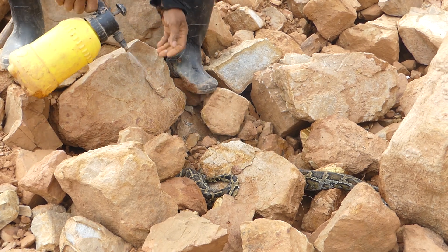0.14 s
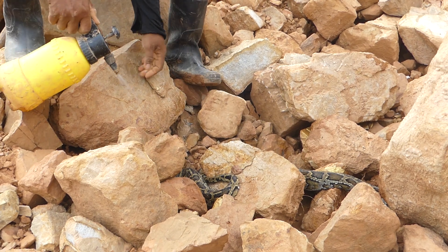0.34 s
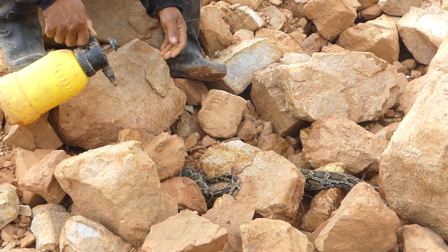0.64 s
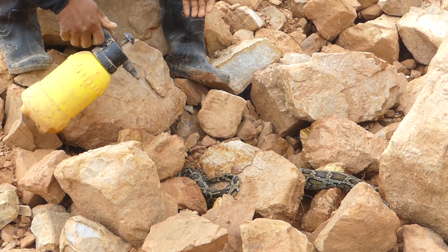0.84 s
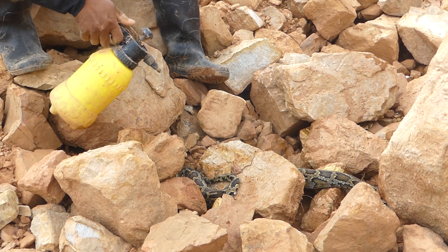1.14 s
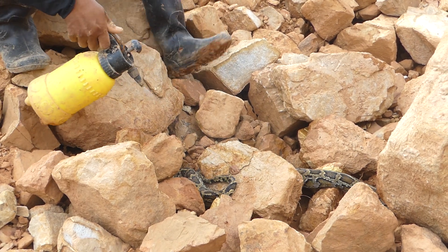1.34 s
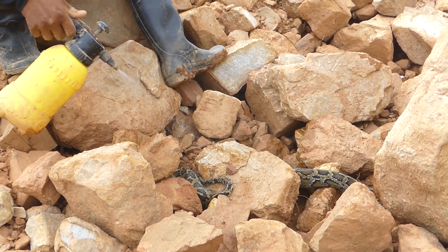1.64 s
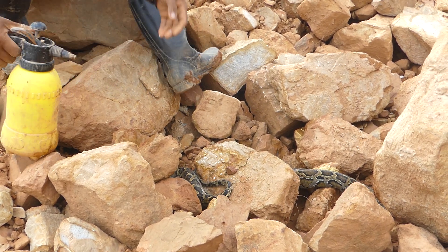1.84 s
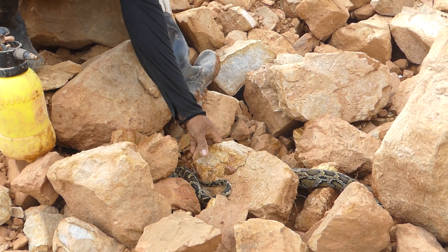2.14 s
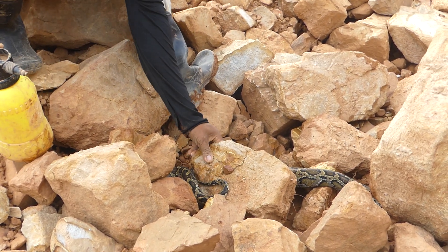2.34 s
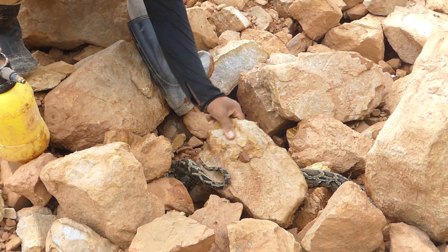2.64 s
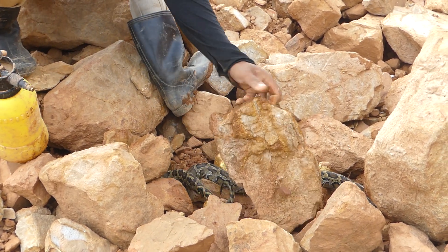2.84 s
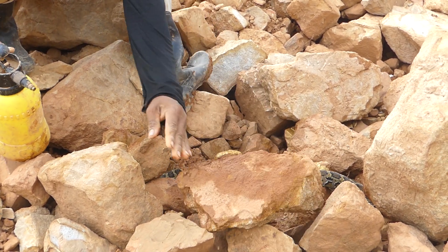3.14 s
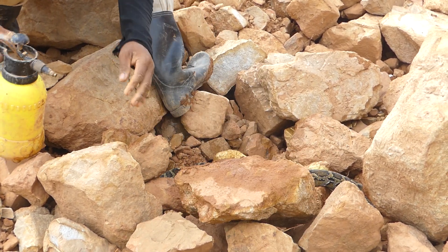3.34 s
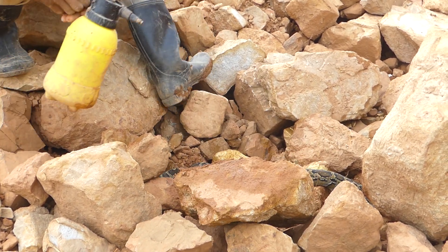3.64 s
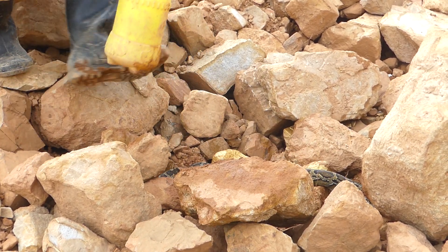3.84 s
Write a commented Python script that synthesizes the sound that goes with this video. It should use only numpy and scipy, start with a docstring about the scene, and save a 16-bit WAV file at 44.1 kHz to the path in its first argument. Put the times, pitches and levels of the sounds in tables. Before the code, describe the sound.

Boots shuffle over loose rocks and a stone tips over, with wind thumping the microphone.

```python
"""On a dry slope, rubber boots shuffle over loose rocks; a large stone is gripped, tips, slides and lands.
Impacts excite the damped modes of stones as dull knocks, and small chips tick. Stick-slip friction
makes grit scrape, stone grind and soles squeak. Nearby rocks scatter a short tail over a faint rustle.
Close by, wind and handling buffet the two microphone ports in short low thumps."""
import sys
import numpy as np
from scipy import signal
from scipy.fft import rfft, irfft
from scipy.io import wavfile

SR = 44100
rng = np.random.default_rng(int(sys.argv[2]) if len(sys.argv) > 2 else 0)


def digitize_waveform(pressure):
    """Quantize a signal to 16-bit integers and store it at the path in sys.argv[1].

    Rows of a 2-D input are taken as channels; values are limited to [-1, 1].
    """
    field = np.atleast_2d(pressure).T
    bounded = np.clip(field, -1, 1)
    quanta = np.round(bounded * 32767).astype(np.int16)
    wavfile.write(sys.argv[1], SR, quanta)


N = 176400
TIME = np.arange(N) / SR
SIDE = np.array([[1], [-1]])  # opposite polarity in left and right

# Likeness of the two channels in diffuse sound: frequency_hz, correlation
COHERENCE = [(100, 0.87), (400, 0.14), (900, 0.44), (2000, 0.55), (5000, 0.84), (11000, 0.68)]
# Rustle of clothes and dust: time_s, level_db
RUSTLE_LEVELS = [(0, -48.5), (1.48, -43.5), (1.51, -56), (1.57, -47), (1.65, -44), (2.2, -51.5), (2.7, -49),
                 (2.93, -49), (3.2, -42.5), (3.44, -49), (4, -49)]
# Colour of the rustle: frequency_hz, gain_db
RUSTLE_COLOUR = [(40, -6), (150, -7), (400, 3), (1300, -7.5), (2000, -9), (3000, -11.5), (5000, -13),
                 (7500, -17.5)]
# Wind between the buffets: time_s, level_db
WIND_LEVELS = [(.14, -28), (.17, -34.5), (.42, -29), (.72, -32.5), (.88, -38.5), (1.0, -57), (1.53, -48.5),
               (1.62, -42.5), (1.76, -36), (2.0, -44.5), (2.1, -63), (2.26, -49), (2.38, -38.5),
               (2.86, -34.5), (2.92, -56), (3.55, -45), (3.72, -35.5), (4, -39)]
# Colour of the wind: frequency_hz, gain_db
WIND_COLOUR = [(25, -27), (50, -25.5), (85, -1.5), (170, -2), (300, -11.5), (500, -34.5), (2000, -51)]
# Eddies and bumps at the ports: centre_s, half_length_s, level_db, pitch_hz, left_over_right_db
PORT_BUFFETS = [(0.0178, 0.00086, -6.5, 356, 12.5), (0.017, 0.0053, -15.5, 194, -1),
                (0.068, 0.0064, -13, 225, 0), (0.099, 0.01, -15, 224, 3.5), (0.136, 0.011, -16, 281, 0.5),
                (0.259, 0.0071, -23, 240, 2.5), (0.289, 0.015, -24.5, 217, 5), (0.385, 0.0067, -12, 278, 4),
                (.404, 0.024, -21.5, 201, -4), (0.427, 0.0046, -16.5, 239, 6),
                (0.489, 0.0067, -26.5, 235, 6.5), (0.678, 0.0055, -21, 182, 0),
                (0.706, 0.0096, -26, 252, 5), (1.568, 0.01, -28.5, 109, -1),
                (1.731, 0.012, -29.5, 151, 0.5), (2.398, 0.0054, -17.5, 139, 4.5),
                (2.411, 0.0026, -13.5, 150, 2), (2.511, 0.008, -28.5, 227, -2),
                (2.585, 0.0045, -23, 203, 4), (2.759, 0.0056, -26, 158, 6), (2.835, 0.0046, -20, 160, 6),
                (2.879, 0.0063, -26.5, 203, 0), (3.615, 0.0085, -29, 212, -0.5),
                (3.765, 0.0087, -24.5, 182, -1), (3.78, 0.0042, -16, 150, -1.5),
                (3.801, 0.0052, -17, 167, -0.5), (3.847, 0.0047, -29, 158, 0), (3.933, 0.0026, -27, 227, 0),
                (3.960, 0.0043, -28, 175, 4.5)]
# Rubber slipping on stone: centre_s, half_length_s, level_db, pitch_hz
SOLE_SQUEAKS = [(1.483, 0.0031, -37.5, 1750), (1.599, 0.0057, -34.5, 1786)]
# Chips that snap or tick: start_s, level_db, pitch_hz, width_octaves, decay_s
CHIP_TICKS = [(0.64, -40.5, 2500, 2.7, .005), (0.922, -37, 2400, 5.7, 0.0016),
              (1.035, -36, 4400, 2.3, 0.002), (1.305, -31, 2160, 2.6, 0.005),
              (1.321, -27, 2740, 1.5, 0.016), (1.931, -28, 2740, 0.077, 0.0025),
              (2.018, -36.5, 2000, 2.7, 0.0075), (2.35, -45, 6400, 0.88, 0.0052),
              (2.436, -43.5, 3280, 1, 0.0096), (2.768, -30.5, 10800, 1.6, 0.0048),
              (2.791, -32, 1580, 1.2, 0.0053), (2.862, -33, 2020, 0.3, 0.0041),
              (3.004, -25, 3700, 1.2, 0.0019), (3.083, -34.5, 4830, 0.18, 0.011),
              (3.135, -36.5, 3420, 1.4, 0.0044), (3.171, -32.5, 3600, 1.3, 0.0036),
              (3.2117, -27.5, 3070, 0.85, 0.0017)]
# Soles and stone dragged over grit: peak_s, rise_s, fall_s, hiss_db, grinding_db
GRIT_SCRAPES = [(0.24, 0.032, 0.044, -45, -43.5), (0.719, 0.0097, 0.021, -41, -43),
                (.84, 0.025, 0.036, -47, -42.5), (1.15, 0.03, 0.043, -46, -49.5),
                (1.338, 0.034, 0.038, -38.5, -35), (1.417, 0.012, 0.053, -49.5, -39.5),
                (1.715, 0.045, 0.017, -50, -43), (1.913, 0.06, 0.048, -44.5, -41.5),
                (2.016, 0.016, 0.031, -40.5, -44), (2.124, 0.015, 0.0069, -49, -49),
                (2.679, 0.1, 0.019, -47, -44.5), (2.77, 0.032, 0.025, -41, -39.5),
                (2.861, 0.015, 0.017, -46.5, -44.5), (3.02, 0.035, 0.044, -45, -49),
                (3.098, 0.043, 0.033, -44, -40), (3.23, 0.018, 0.067, -47, -56),
                (3.306, .005, 0.065, -44.5, -41), (3.467, 0.0015, 0.0037, -69, -40),
                (3.501, 0.015, 0.0087, -45.5, -49), (3.665, 0.057, 0.07, -48, -46.5)]
# Colour of a scrape's hiss: frequency_hz, gain_db
HISS_COLOUR = [(700, -10), (1800, -3.5), (3000, 0), (5000, -1.5), (7500, -7.5), (10000, -7.5),
               (15000, -8.5)]
# Colour of a scrape's grinding: frequency_hz, gain_db
GRIND_COLOUR = [(100, -14.5), (250, 3.5), (950, -1.5), (1350, -12.5), (1900, -3.5), (2900, -17),
                (6000, -31.5)]
# Stone grinding on stone, large ones low and pebbles high: start_s, length_s, level_db, resonance_hz
STONE_GRINDS = [(1.407, 0.033, -42, 944), (1.973, 0.072, -45.5, 1700), (3.117, 0.016, -41, 1010),
                (3.294, 0.053, -44, 1000), (3.65, .02, -42.5, 3600), (3.683, .019, -41, 3600)]
# Modes of a stone on its bed, which each knock scales by its ratios: frequency_hz, gain_db, t60_s
STONE_MODES = [(181, 15.5, 0.03), (240, 4, 0.081), (419.5, 10, 0.034), (597, 21, 0.0048), (760, 8.5, .016),
               (1045, 6, 0.047), (1410, 6.5, 0.031), (1734, 5, 0.022), (2610, 5.5, 0.0087)]
# Stone striking stone: start_s, level_db, pitch_ratio, ring_time_ratio, brightness_hz
STONE_KNOCKS = [(.458, -48, 1.03, 0.59, 1100), (1.208, -39, 1.43, 1.4, 2430),
                (1.256, -46.5, 1.06, 1.2, 900), (1.626, -49.5, 1.18, 1.9, 4000),
                (1.685, -43.5, 1.1, 1.2, 950), (2.719, -39, 0.96, 0.64, 695),
                (2.791, -40.5, 1.28, 0.85, 4020), (3.02, -46, 1.1, 0.85, 700), (3.055, -39.5, 1.1, 5, 2800),
                (3.063, -44.5, 0.88, 1, 900), (3.088, -40.5, 1.3, 2.4, 2000),
                (3.1699, -29, 1.043, 0.55, 1500), (3.249, -45, 0.76, 1, 600),
                (3.357, -36.5, 0.95, 0.72, 245), (3.634, -49.5, 2.28, 0.88, 4000)]


def from_db(db):
    """Amplitude ratio of a level in decibels."""
    return 10 ** (np.asarray(db) / 20)


def rms(x):
    """Root-mean-square amplitude."""
    return np.sqrt(np.mean(x ** 2) + 1e-20)


def rms_one(x):
    """Normalisation to unit power."""
    return x / rms(x)


def level(points):
    """Amplitude envelope, interpolated in decibels between (time_s, level_db) points."""
    return from_db(np.interp(TIME, *np.transpose(points)))


def at_hz(points, hz):
    """Interpolation of a table on a log-frequency axis."""
    frequencies, values = np.transpose(points)
    return np.interp(np.log(hz + 1), np.log(frequencies), values)


def add(out, start_s, sound, pan_db=0):
    """Superposition: a sound joins the mix, placed by its left-over-right level difference."""
    i = int(start_s * SR)
    sound = sound[..., max(-i, 0):N - i] * from_db(SIDE * pan_db / 2)
    out[:, max(i, 0):max(i, 0) + sound.shape[1]] += sound


def band(x, hz, octaves, order=1):
    """Band-pass filtering about a geometric centre frequency."""
    edge_ratio = 2 ** (octaves / 2)
    sos = signal.butter(order, [hz / edge_ratio, hz * edge_ratio], "band", fs=SR, output="sos")
    return signal.sosfilt(sos, x)


def coloured(pair, spectrum):
    """Partial coherence: two independent signals blend into stereo with this spectrum, at rms 1."""
    hz = np.arange(N // 2 + 1) * SR / N
    mid, side = rfft(pair) * from_db(at_hz(spectrum, hz))
    alike = at_hz(COHERENCE, hz)
    return rms_one(irfft(np.sqrt(1 + alike) * mid + np.sqrt(1 - alike) * side * SIDE, N))


def flutter(rate_hz):
    """Random modulation: Gaussian values joined by straight lines."""
    return np.interp(TIME * rate_hz, np.arange(N // 20), rng.standard_normal(N // 20))


def grains(per_s, spread_db):
    """Shot noise: two trains of random clicks, mostly small, a few large."""
    sizes = from_db(spread_db * np.minimum(rng.exponential(1, (2, N)), 5))
    return rms_one(sizes * rng.choice([-1, 1], (2, N)) * (rng.random((2, N)) < per_s / SR))


def rock_resonance(x, low_hz=900, high_hz=14000, q=40, ring_gain=2.4):
    """Resonance: each patch of rock adds its own faint ringing pitches; the result has rms 1."""
    t = TIME[:SR // 20]
    hz = np.exp(rng.uniform(np.log(low_hz), np.log(high_hz), size=(24, 1)))
    damping = np.pi * hz / q
    modes = damping / SR * np.cos(2 * np.pi * hz * t) * np.exp(-damping * t)
    response = ring_gain * np.sum(rng.choice([-1, 1], hz.shape) * modes, axis=0)
    response[0] += 1  # direct sound
    return rms_one(signal.fftconvolve(x, response[None], axes=1)[:, :x.shape[1]])


def slope_echo(x, t60_s=.2, delay_s=.003):
    """Scattering from nearby rocks returns a short, exponentially decaying tail."""
    t = TIME[:SR // 3]
    tail = band(rng.standard_normal((2, len(t))), hz=1550, octaves=4.1)
    tail = tail * from_db(-60 * t / t60_s) * (t > delay_s)
    return signal.fftconvolve(x, tail / np.sqrt(np.sum(tail ** 2) / 2), axes=1)[:, :N]


def rustle():
    """Modulated noise: clothes and dust give a soft, grainy hiss whose resonances keep changing."""
    dust = rng.standard_normal((2, N)) + .48 * grains(per_s=900, spread_db=4)
    dust = coloured(dust * from_db(3.73 * flutter(45)), RUSTLE_COLOUR)
    ringing, size = np.zeros((2, N)), SR // 7
    for centre in range(0, N, size // 2):
        start = max(centre - size // 2, 0)
        piece = dust[:, start:centre + size // 2]
        piece = piece * np.hanning(size)[-piece.shape[1]:]
        add(ringing, start / SR, rock_resonance(piece) * rms(piece))
    return level(RUSTLE_LEVELS) * (ringing + dust / 2) / 1.5


def wind():
    """Turbulence: fluctuating pressure on the ports is heard as a lumpy rumble."""
    rumble = coloured(rng.standard_normal((2, N)), WIND_COLOUR)
    lumps = rms_one(from_db(7.6 * np.tanh(flutter(45))))
    return level(WIND_LEVELS) * rumble * lumps


def buffets(port_lag_s=.00087, flank_octaves=1.28, top_ratio=2.45, bass_hz=70, side_gain=1.11):
    """Pressure transients: each eddy or bump is a few low swings that reach one port before the other."""
    out, size = np.zeros((2, N)), 4096
    t = (np.arange(size) - size / 2) / SR
    hz = np.arange(size // 2 + 1) * SR / size
    for centre_s, half_s, db, pitch_hz, pan_db in PORT_BUFFETS:
        hump = 1 / (1 + (np.log2((hz + 1) / pitch_hz) / flank_octaves) ** 2) ** 2
        hump /= np.sqrt(1 + (hz / pitch_hz / top_ratio) ** 8)
        hump *= hz ** 2 / (hz ** 2 + bass_hz ** 2)
        window = np.exp(-(t / half_s) ** 2 / 2)
        swirl = rng.standard_normal(size)
        for _ in range(3):  # flatten the spectrum while keeping the burst short
            swirl = irfft(np.exp(1j * np.angle(rfft(swirl * window))))
        side = side_gain * rng.standard_normal(size) * np.std(swirl)
        lag = np.exp(1j * np.pi * hz * port_lag_s * rng.choice([-1, 1]) * SIDE)
        puff = irfft(rfft((swirl + side * SIDE) * window) * lag * hump)
        add(out, centre_s + t[0], from_db(db) * rms_one(puff) * rms(window), pan_db)
    return out


def squeaks(fall_hz_per_s=13000, roughness_rad=.5):
    """Stick-slip oscillation: a rubber sole gives a brief, rough, falling chirp."""
    out, t = np.zeros((2, N)), TIME[:SR // 10] - .05
    for centre_s, half_s, db, hz in SOLE_SQUEAKS:
        phase = 2 * np.pi * (hz * t - fall_hz_per_s * t * t / 2)
        jitter = roughness_rad * flutter(718)[:len(t)]
        envelope = np.exp(-(t / half_s) ** 2 / 2)
        add(out, centre_s + t[0], from_db(db) * np.sin(phase + jitter) * envelope, pan_db=2)
    return out


def ticks():
    """Transient excitation: a decaying crackle rings a small chip in one frequency band."""
    out, t = np.zeros((2, N)), TIME[:SR // 10]
    for start_s, db, hz, octaves, decay_s in CHIP_TICKS:
        envelope = np.exp(-t / decay_s)
        crackle = rng.standard_normal((2, len(t))) * from_db(1.6 * rng.standard_normal(len(t)))
        mid, side = band(crackle * envelope, hz, octaves, order=2)
        add(out, start_s, from_db(db) * rms_one(mid + .098 * side * SIDE) * rms(envelope), pan_db=1.5)
    return out


def scrapes():
    """Sliding friction: as a drag swells and fades, grains catch and slip, hissing and grinding."""
    out, slips = np.zeros((2, N)), from_db(4.8 * flutter(140))
    hiss = coloured(grains(per_s=3500, spread_db=3) * slips, HISS_COLOUR)
    grind = coloured(grains(per_s=2500, spread_db=5) * slips, GRIND_COLOUR)
    for peak_s, rise_s, fall_s, hiss_db, grind_db in GRIT_SCRAPES:
        near = np.abs(TIME - peak_s) < .2
        t = TIME[near] - peak_s
        stroke = np.exp(-(t / np.where(t < 0, rise_s, fall_s)) ** 2 / 2)
        for friction, db, pan_db in (hiss, hiss_db, 0), (grind, grind_db, 2):
            drag = rock_resonance(friction[:, near] * stroke)
            add(out, peak_s + t[0], from_db(db) * rms(stroke) * drag, pan_db)
    return out


def grinds():
    """Forced resonance: uneven slips drive one band as a stone judders over its bed."""
    out = np.zeros((2, N))
    for start_s, length_s, db, hz in STONE_GRINDS:
        size = int(length_s * SR)
        slips = grains(per_s=670, spread_db=1.5)
        mid, side = band(slips, hz, octaves=.27, order=2)[:, -size:]
        envelope = np.sqrt(np.abs(np.hanning(size)))
        add(out, start_s, from_db(db) * rms_one((mid + .5 * side * SIDE) * envelope))
    return out


def knocks(crush_gain=.0475, crush_decay_s=.0038, latest_contact_s=.003636, low_cut_hz=145):
    """Modal vibration: a blow, crushed grit and a second contact set a stone's damped modes ringing."""
    out, t = np.zeros((2, N)), TIME[:SR // 8]
    mode_hz, mode_db, mode_t60_s = np.transpose(STONE_MODES)[:, :, None]
    low_cut = signal.butter(2, low_cut_hz, "high", fs=SR, output="sos")
    for start_s, db, pitch_ratio, ring_ratio, bright_hz in STONE_KNOCKS:
        gains = from_db(mode_db + rng.normal(0, .38, mode_db.shape))
        knock = 0
        for hz, gain, t60_s in zip(mode_hz * pitch_ratio, gains, mode_t60_s * ring_ratio):
            force, side = crush_gain * rng.standard_normal((2, len(t))) * np.exp(-t / crush_decay_s)
            force[0] += rng.choice([-1, 1])  # the blow
            second_contact = int(latest_contact_s * rng.uniform(.5, 1) * SR)  # the stone rocks
            force[second_contact] += rng.choice([-1, 1]) * 2 / 3
            mode = np.sin(2 * np.pi * hz * rng.normal(1, .05) * t) * from_db(-60 * t / t60_s)
            ring = signal.fftconvolve(force + .5 * side * SIDE, mode[None])[:, :len(t)]
            knock += gain / np.hypot(1, hz / bright_hz) * ring
        add(out, start_s, from_db(db) * rms_one(signal.sosfilt(low_cut, knock)))
    return out


def scene():
    """Superposition of rocks and boots, their echo, the rustle and the wind at the microphone."""
    rocks = knocks() + ticks() + squeaks() + scrapes() + grinds()
    return rocks + from_db(-20) * slope_echo(rocks) + rustle() + wind() + buffets()


def record(dry):
    """Band limiting and soft saturation: deep bass and top treble are cut, high peaks are rounded."""
    low_hz, high_hz, ceiling = 45, 15850, .93
    thin = signal.sosfilt(signal.butter(2, low_hz, "high", fs=SR, output="sos"), dry)
    rounded = thin / (1 + (thin / ceiling) ** 6) ** (1 / 6)
    return signal.sosfilt(signal.ellip(12, .1, 80, high_hz, fs=SR, output="sos"), rounded)


dry = scene()
out = record(dry)
digitize_waveform(out)
```